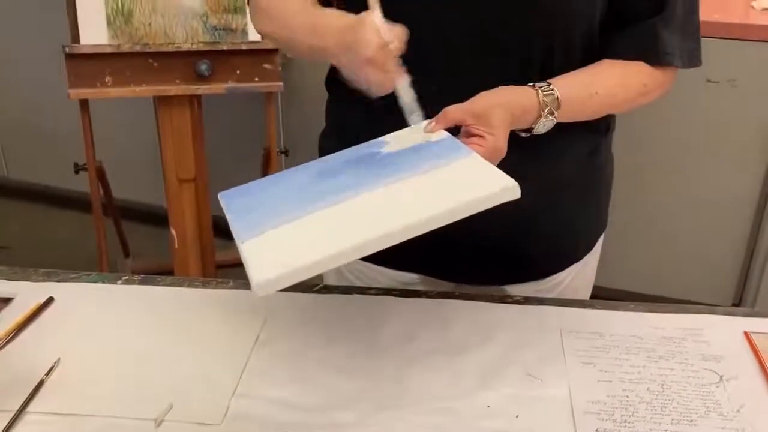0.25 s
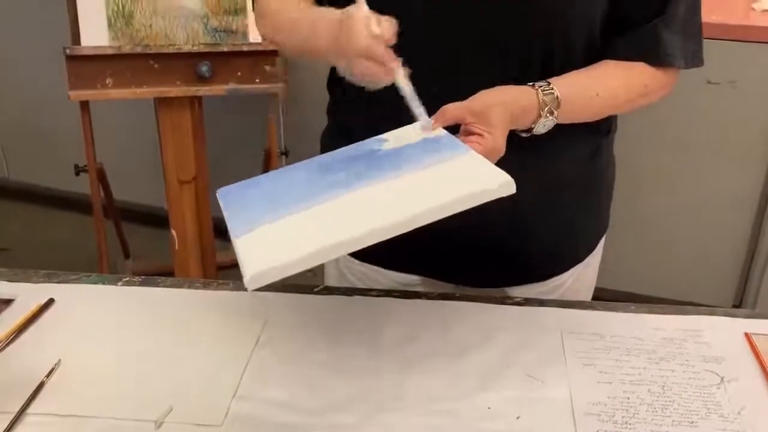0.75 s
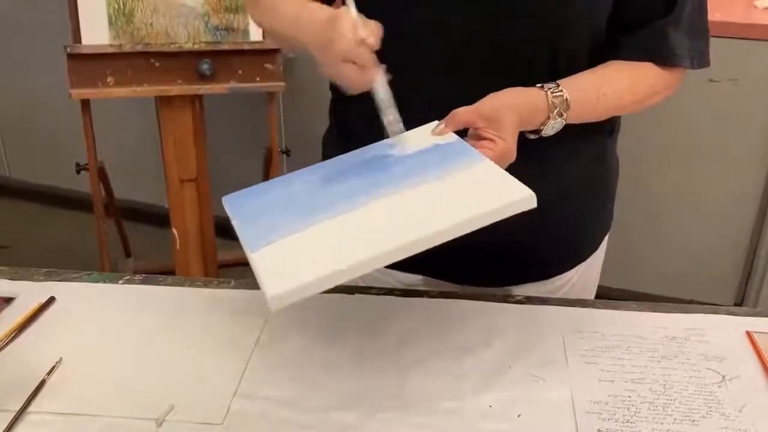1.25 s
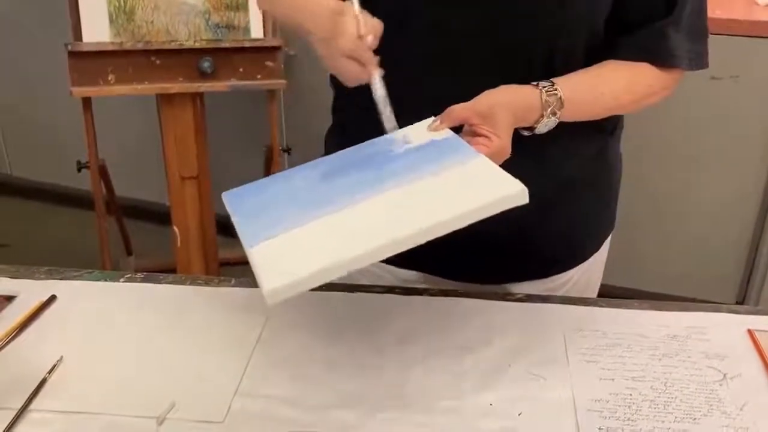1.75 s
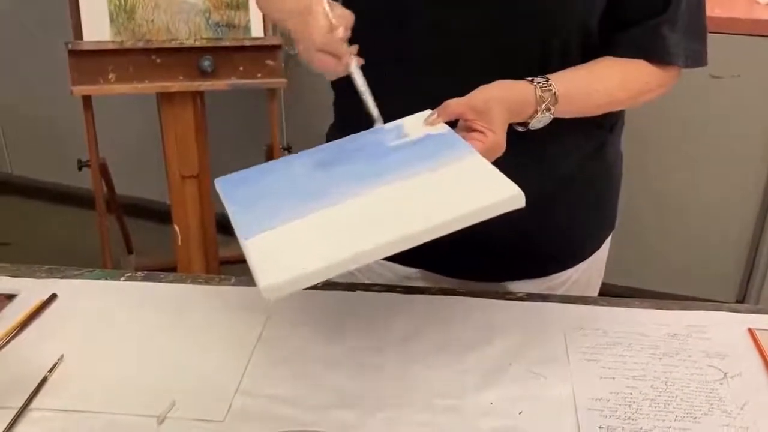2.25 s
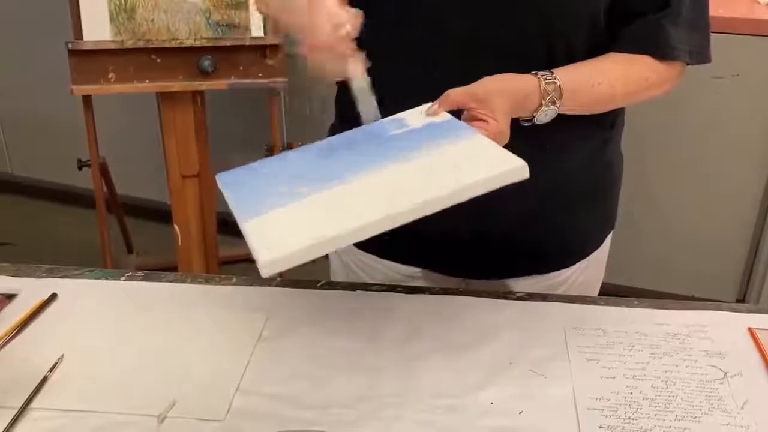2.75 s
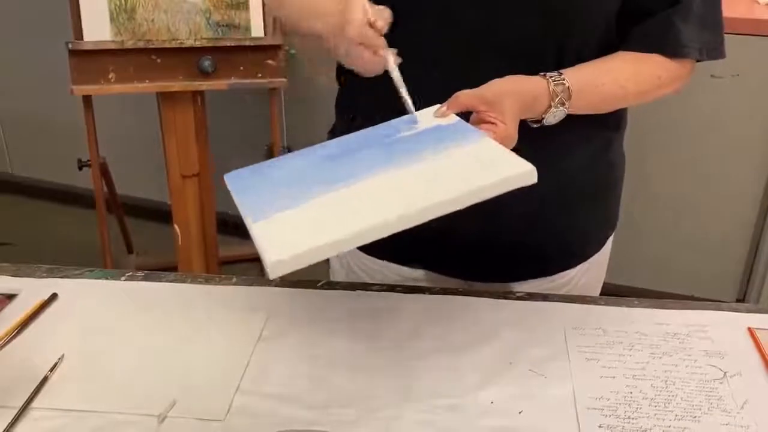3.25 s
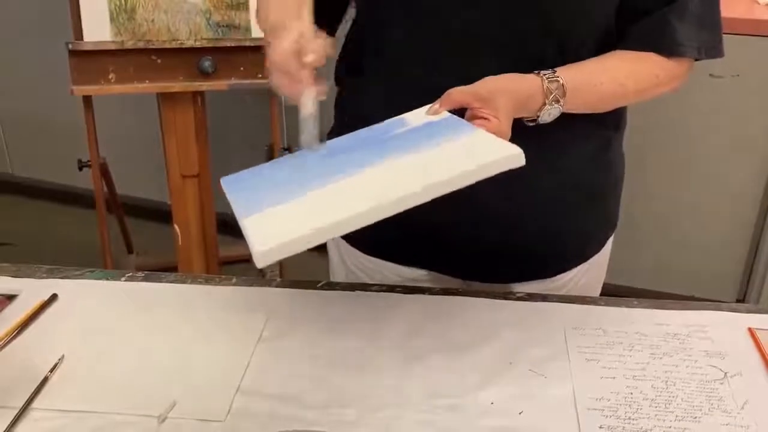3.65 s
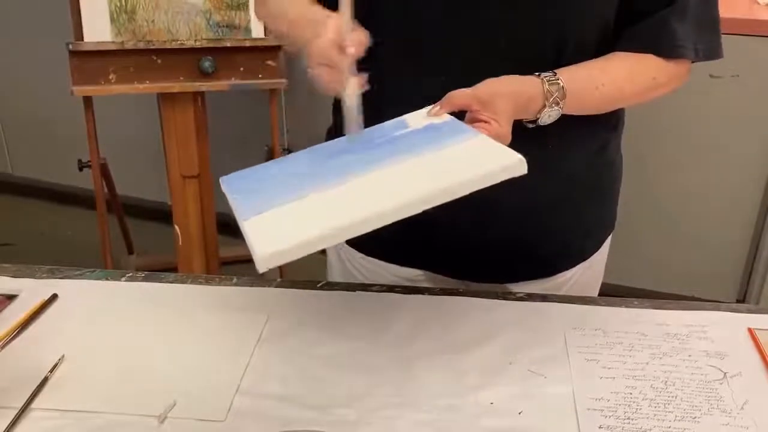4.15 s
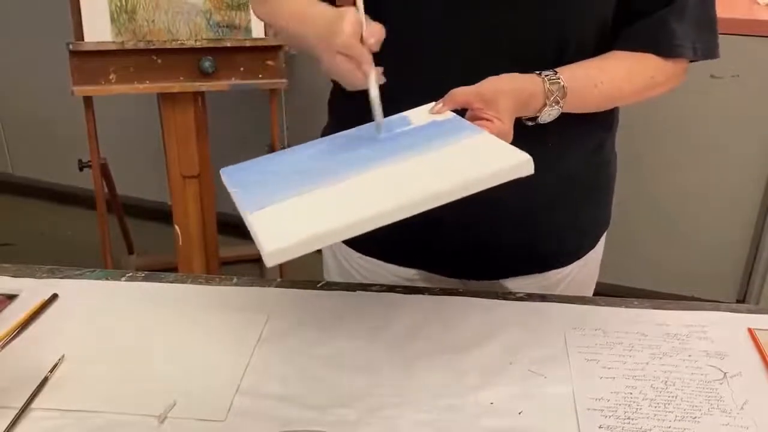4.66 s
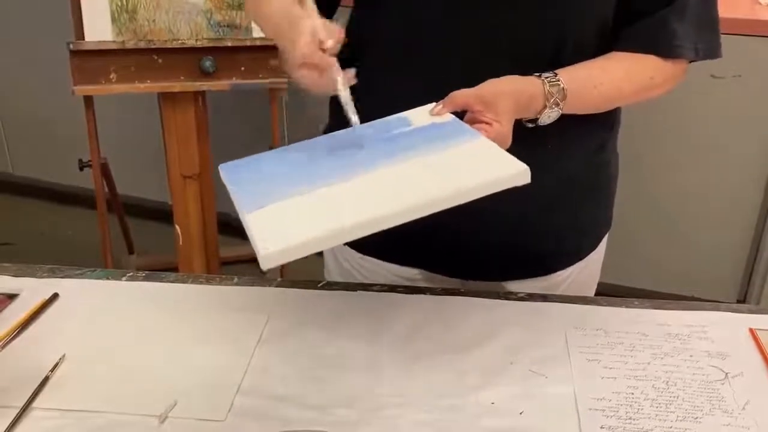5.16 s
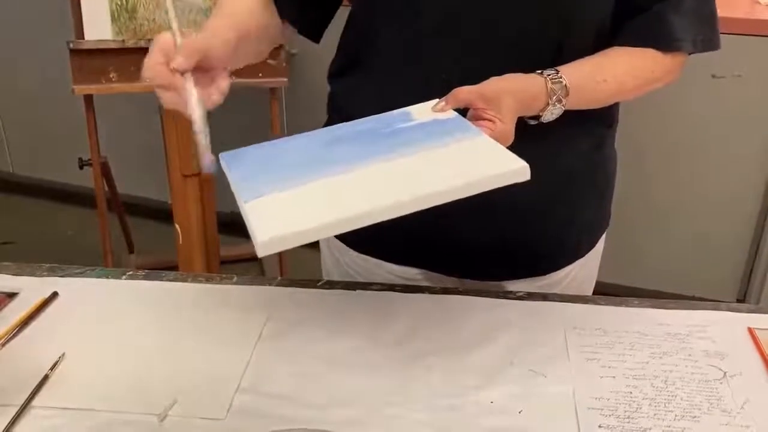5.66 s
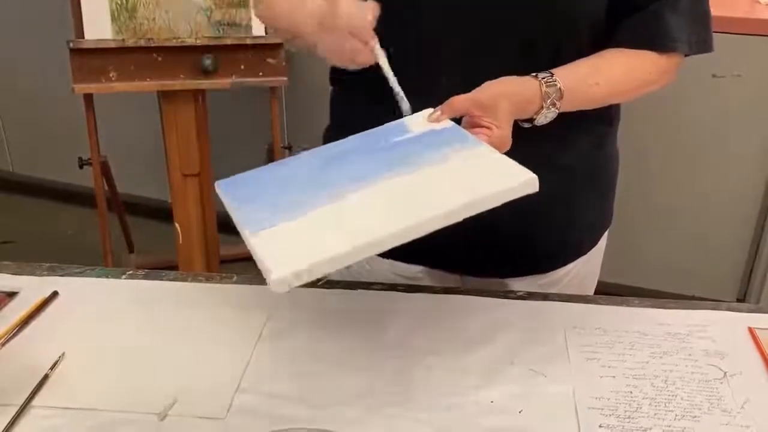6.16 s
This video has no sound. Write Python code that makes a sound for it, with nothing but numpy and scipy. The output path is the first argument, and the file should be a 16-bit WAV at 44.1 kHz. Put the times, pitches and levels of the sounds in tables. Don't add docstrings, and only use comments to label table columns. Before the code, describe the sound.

Steady low fan rumble and a wavering electrical hum lie under close bristle sounds on stretched cloth. Separate soft strokes come first, then a brighter, louder, hurried scrub, a short gap, and irregular sweeping strokes with small clicks of the brush against the frame. A dull thump comes late. The room is dry, the treble slightly warbly and full of small holes.

```python
import sys
import numpy as np
from scipy import signal
from scipy.io import wavfile
from scipy.ndimage import uniform_filter1d

SR = 44100
rng = np.random.default_rng(int(sys.argv[2]) if len(sys.argv) > 2 else 0)


def dump_mix(stems):
    frames = np.atleast_2d(stems).T
    limited = np.clip(frames, -1, 1)
    pcm = np.round(limited * 32767).astype(np.int16)
    wavfile.write(sys.argv[1], SR, pcm)


def natural_amplitude(level_db):
    exponent = np.asarray(level_db, float) / 20
    return 10 ** exponent


N = 283122


def evened(x):
    return x / np.sqrt(np.mean(np.abs(x) ** 2) + 1e-20)


def unit(power):
    return power / power.mean(0)


def read(points, hz, order=1):
    table = np.transpose(points)
    return np.interp(np.log(hz + 1), np.log(table[0] + 1), table[order])


def resonance(hz, centre_hz, width_hz):
    return 1 / (1 + (2 * (hz - centre_hz) / width_hz) ** 2) ** 2


def drift(rate_hz, t):
    rates = np.geomspace(rate_hz / 20, rate_hz, 20)
    return evened(sum(np.sin(2 * np.pi * (f * t + rng.random())) / np.sqrt(f) for f in rates))


def blotches(shape, frames, bins):
    x = uniform_filter1d(rng.standard_normal(shape[::-1]), frames, 0)
    return evened(uniform_filter1d(x, bins, 1)).T


def pair(a, b, hz, same, left, lead):
    c = np.clip(read(same, hz), -1, 1)[:, None]
    lean = natural_amplitude(read(left, hz) / 2)[:, None]
    late = np.exp(-1j * read(lead, hz))[:, None]
    return np.array([a * lean, (c * a * late + np.sqrt(1 - c ** 2) * b) / lean])


# f/Hz, level/dB
AIR_SPECTRUM = [(22, -38), (40, -5.5), (85, 0), (140, -3), (172, -8), (195, -19.5), (300, -19.5),
                (850, -21.5), (1200, -30.5), (2500, -37.5), (4500, -47.5), (5300, -50), (12500, -63.5),
                (13600, -69)]
AIR_DB = -32
# f/Hz, width/Hz, level/dB rms
DUCT = [(229.7, 31.5, -43.5), (273.2, 7.1, -46.5), (419, 32, -54)]
# f/Hz, likeness/1
AIR_SAME = [(30, 0.985), (130, 0.96), (290, 0.83), (640, 0.37), (1400, 0.53), (3100, 0.2), (7000, 0.9)]
# f/Hz, L-R/dB
AIR_LEFT = [(40, -6.5), (110, 1.5), (220, -2), (500, 2), (2000, 1.2), (6000, 0.5)]
# f/Hz, lead/rad
AIR_LEAD = [(30, 0.12), (110, -0.27), (340, .5), (700, 3), (1120, 1.5), (2200, 4), (4000, 8)]


def air():
    hz, t, z = signal.stft(rng.standard_normal((2, N)), SR, nperseg=4096)
    power = natural_amplitude(2 * AIR_DB) * unit(natural_amplitude(2 * read(AIR_SPECTRUM, hz)))
    for f, width_hz, db in DUCT:
        power += natural_amplitude(2 * db) * unit(resonance(hz, f, width_hz))
    swell_db = 0.33 * drift(1.15, t)
    z = pair(*z, hz, AIR_SAME, AIR_LEFT, AIR_LEAD) * np.sqrt(power)[:, None] * natural_amplitude(swell_db)
    standing_db = 2.24 * blotches(z.shape[1:], 8, 4)
    z *= natural_amplitude(standing_db * (hz[:, None] > 300))
    return signal.istft(z, SR, nperseg=4096)[1][:, :N]


# f/Hz, level/dB rms, wander/dB, L-R/dB
TONES = [(54.64, -41, -1.5, 1), (74.3, -51, 6.5, -10), (92.5, -48.5, 0, -3), (110.6, -53, -2.5, -5),
         (114.35, -29.5, 0.9, -3.5), (127.8, -67, -13, -25), (229.6, -48, 3, 0)]
# f/Hz, level re load/dB, wander/dB
BUZZ = [(238.2, 0.5, 0.5), (241.3, -9.5, 0.5)]
# t/s, buzz level/dB rms
BUZZ_LOAD = [(0.0, -43), (0.79, -39.5), (0.82, -54), (0.97, -40), (1.55, -38), (1.63, -53), (2.07, -33.5),
             (2.47, -45), (2.61, -34), (3.04, -51), (3.31, -34.5), (3.36, -45.5), (4.9, -40), (4.95, -62),
             (5.35, -36.5), (5.78, -62), (5.95, -38), (6.42, -39)]
BEAT_TOP_S = 2.72


def hum():
    t, out = np.arange(N) / SR, np.zeros((2, N))
    coarse_t = t[::500]
    for hz, db, wander_db, lean_db in TONES:
        level = natural_amplitude(db + wander_db * np.interp(t, coarse_t, drift(2.48, coarse_t)))
        tone = np.sqrt(2) * level * np.sin(2 * np.pi * (hz * t + rng.random()))
        out += tone * natural_amplitude(np.array([[0.5], [-0.5]]) * lean_db)
    load_db = np.interp(t, *np.transpose(BUZZ_LOAD))
    for hz, db, wander_db in BUZZ:
        level = natural_amplitude(load_db + db + wander_db * np.interp(t, coarse_t, drift(6.0, coarse_t)))
        phase = 2 * np.pi * hz * (t - BEAT_TOP_S) + np.array([[0.35], [0]])
        out += np.sqrt(2) * level * np.sin(phase)
    return out


def room(x, t60_s=0.14, wet_db=-10):
    t = np.arange(SR // 3) / SR
    tail = rng.standard_normal((2, len(t))) * natural_amplitude(-60 * t / t60_s) * (t > 0.004)
    tail /= np.linalg.norm(tail[0])
    return x + natural_amplitude(wet_db) * signal.fftconvolve(x, tail, axes=1)[:, :N]


# t/s, peak level/dB, f/Hz, t60/s
TAPS = [
    (3.2393, -34, 3160, 0.015),
    (3.6074, -27.5, 1280, 0.024),
    (4.837, -25.5, 1470, 0.018),
    (5.5077, -24.5, 4230, 0.014),
]
# t/s, peak level/dB, f/Hz, t60/s
THUMP = [
    (4.761, -22, 55.6, 0.29),
]
# t/s, peak level/dB
TICKS = [
    (1.5823, -35),
    (1.699, -21.5),
    (5.7963, -31.5),
]


def knocks():
    out, t = np.zeros((2, N + SR)), np.arange(SR) / SR
    for s, db, hz, t60_s in TAPS + THUMP:
        ring = np.sin(2 * np.pi * hz * t) + 0.29 * np.sin(2 * np.pi * 1.6 * hz * t)
        ring *= natural_amplitude(db - 60 * t / t60_s) * (1 - np.exp(-t * hz))
        start = round(s * SR)
        out[:, start:start + SR] += ring * natural_amplitude(np.array([[1.2], [-1.2]]))
    for s, db in TICKS:
        snap = rng.standard_normal((2, SR)) * natural_amplitude(db - 7 - 60 * t / 0.026)
        start = round(s * SR)
        out[:, start:start + SR] += snap
    return out[:, :N]


# t/s, length/s, weave level/dB, tips re weave/dB, cloth re weave/dB
SWEEPS = [(-0.104, 0.17, -52.5, 8, -3.5), (0.035, 0.22, -40.5, 2.5, -4.5), (0.169, 0.12, -47.5, -2, -6),
          (0.313, 0.24, -44.5, 2.5, -3.5), (0.487, 0.092, -55, -9, -1), (0.635, 0.22, -47.5, 3.5, -0.5),
          (1.037, 0.2, -48.5, 1, -0.5), (1.301, 0.18, -46, 1.5, -4.5), (2.77, 0.23, -41.5, -0.5, -9.5),
          (2.94, 0.16, -40, 1, -1.5), (3.03, 0.2, -54, 3, -14), (3.185, 0.18, -48.5, 6.5, -8),
          (3.236, 0.28, -44, 2.5, -1.5), (3.505, 0.18, -41, -1, -4), (3.785, 0.19, -45.5, -0.5, -9),
          (3.867, 0.19, -45, 2, -5.5), (4.233, 0.28, -48.5, 2, -1), (4.533, 0.12, -61.5, 0.5, 6),
          (4.676, 0.29, -50, 1.5, -1), (4.914, 0.16, -42.5, -2.5, -4.5), (5.016, 0.14, -50.5, 5.5, -6),
          (5.131, 0.16, -46, 5.5, -16), (5.213, 0.15, -48.5, 3.5, -3), (5.36, 0.24, -45, -1, -2)]
# t/s, length/s, weave level/dB, tips re weave/dB, cloth re weave/dB
RUBS = [(0.595, 0.077, -55, 3.5, -10), (1.557, 0.15, -38, 0, -6), (1.671, 0.098, -39.5, 4, -6.5),
        (1.752, 0.12, -38.5, 2, -7.5), (1.841, 0.11, -37.5, -1, -4), (1.935, 0.12, -34, -4, -13.5),
        (2.028, 0.093, -30, -4, -14.5), (2.101, 0.12, -35, -1, -25), (2.197, 0.088, -36.5, -5, -20),
        (2.265, 0.1, -39.5, 1.5, -21), (2.358, 0.082, -35, 0, -17), (2.431, 0.12, -48.5, 8, -19),
        (2.526, 0.051, -41, -1, -21), (5.76, 0.1, -52.5, 0, -13), (5.989, 0.071, -45, 1.5, -16),
        (6.278, 0.094, -34, -4, -14.5)]


def stroked(t, db, sharp, late, offset_db):
    start, length = np.transpose(SWEEPS + RUBS)[:2, :, None]
    progress = np.clip((t - start) / length, 0, 1)
    arch = abs(np.sin(np.pi * progress ** late)) ** sharp
    return (natural_amplitude(2 * (db + offset_db))[:, None] * arch).sum(0) + 1e-12


# f/Hz, level/dB
WEAVE = [(500, -6.5), (1100, -19), (1900, -9), (2500, -4), (3100, -6.5), (3700, -1), (4500, -15),
         (6000, -29)]
# f/Hz, level/dB
RASP = [(2500, -46), (3700, -11), (4300, 4.5), (5300, 0.5), (6500, -4), (7500, -14), (9000, -40)]
# f/Hz, level/dB
TIPS = [(5000, -12.5), (6800, 2.5), (8300, 3.5), (10000, 4), (12000, 0), (13400, 1), (15000, 1),
        (16000, -10.5)]
# f/Hz, likeness/1
STROKE_SAME = [(600, 0.76), (1500, 0.98), (3000, 0.92), (5000, 0.54), (7000, 0.095), (15000, 0.084)]
# f/Hz, L-R/dB
STROKE_LEFT = [(1000, 4), (2400, 0), (4400, 2.5), (8000, -0.4)]
# f/Hz, lead/rad
STROKE_LEAD = [(600, -4.4), (1700, 0.23), (2800, 1.36), (4200, 1.86), (5900, 3.5), (7600, 4.5)]
# sharpness, lateness exponent, offset/dB
WEAVE_ARCH, TIPS_ARCH, CLOTH_ARCH = (5, 0.96, 0.25), (4.17, 0.85, 0.25), (6.3, 0.99, -0.67)
RASP_DB, RASP_PER_DB, FULL_SCRUB_DB = -0.3, 0.17, -26
LINGER_S, LINGER_DB = 0.054, -16


def brush(tick_db=3.0, patchy_db=3.5, flicker_db=1.2, cloth_hz=1520, cloth_width_hz=560, tail=0.12):
    ticks = rng.standard_normal((2, N)) * natural_amplitude(tick_db * np.minimum(rng.exponential(1, N), 5))
    hz, t, z = signal.stft(evened(ticks), SR, nperseg=256, noverlap=192)
    scrub_db, tips_db, drum_db = np.transpose(SWEEPS + RUBS)[2:]
    scrub = stroked(t, scrub_db, *WEAVE_ARCH)
    drum = stroked(t, scrub_db + drum_db, *CLOTH_ARCH)
    tips = stroked(t, scrub_db + tips_db, *TIPS_ARCH)

    rasp_db = RASP_DB + RASP_PER_DB * (10 * np.log10(scrub) - FULL_SCRUB_DB)
    rasp = np.clip(natural_amplitude(2 * rasp_db), 0.05, 0.9)
    power = np.outer(unit(natural_amplitude(2 * read(WEAVE, hz))), 1 - rasp)
    power += np.outer(unit(natural_amplitude(2 * read(RASP, hz))), rasp)
    power *= scrub
    power += np.outer(unit(resonance(hz, cloth_hz, cloth_width_hz)), drum)
    power += np.outer(unit(natural_amplitude(2 * read(TIPS, hz))), tips)

    power = signal.lfilter([1 - tail], [1, -tail], power)
    keep = np.exp(-(t[1] - t[0]) / LINGER_S)
    power += natural_amplitude(2 * LINGER_DB) * signal.lfilter([1 - keep], [1, -keep], power)

    patches = blotches(power.shape, 16, 2)
    flicker = evened(uniform_filter1d(rng.standard_normal(len(t)), 6))
    z = pair(*z, hz, STROKE_SAME, STROKE_LEFT, STROKE_LEAD) * np.sqrt(power)
    z *= natural_amplitude(patchy_db * patches + flicker_db * flicker)
    return signal.istft(z, SR, nperseg=256, noverlap=192)[1][:, :N]


def scene():
    return air() + hum() + room(brush() + knocks())


# f/Hz, whistle chance/1, hole chance/1
THRIFT = [(5300, 0., 0.), (6200, 0., .05), (7200, .06, .55), (8200, .2, .35), (9000, .08, .5),
          (9800, .28, .18), (12000, .25, .45), (13400, .08, .75), (14500, .22, .4), (15500, .1, .7)]
# f/Hz, level re neighbours/dB
ROUNDED_AWAY = [(300, -26.5), (1000, -3.5), (4000, -5.5), (7000, -3.5), (12000, -3.5)]
BAND_HZ, GAP_HZ, TOP_HZ = 750, 9170, 15840


def thrifty_link(x, uneven_db=3.5, whistle_db=17.0, whistle_hz=70, gap_db=-30):
    mid_side = [x[0] + x[1], x[0] - x[1]]
    hz, t, z = signal.stft(mid_side, SR, nperseg=2048, noverlap=1536)
    band = ((hz + 120) // BAND_HZ).astype(int)
    half = ((hz + 120) // (BAND_HZ / 2)).astype(int)
    luck = rng.random((len(t) // 4 + 2, 4, half.max() + 1))
    luck = np.repeat(luck, 4, 0)[:len(t)].transpose(1, 2, 0)

    treble = (abs(z[:, 180:300]) ** 2).mean((0, 1))
    treble_db = 10 * np.log10(uniform_filter1d(treble, 30) + 1e-12)
    short = (0.5 + luck[3, 0]) * np.interp(treble_db, [-68, -58], [1.15, 0.7])

    fate = np.where(luck[2] < 0.5, luck[0], luck[:2])
    whistle = fate[:, band] < short * read(THRIFT, band * BAND_HZ)[:, None]
    wide = np.where(luck[3, band] < 0.5, fate[:, band], fate[:, half])
    side_risk = np.array([1, 1.7])[:, None, None]
    hole = 1 - wide < short * read(THRIFT, hz, order=2)[:, None] * side_risk

    edge = natural_amplitude(whistle_db) * np.exp(-((hz - band * BAND_HZ) / whistle_hz) ** 2)[:, None]
    kept = ~hole * natural_amplitude(uneven_db * (2 * luck[3, half] - 1) * (hz > 6500)[:, None])
    faint_loss = np.interp(hz, [5200, 6000, 12600, 13200], [0, 0.2, 0.2, 0.65])
    faint = wide > faint_loss[:, None]
    power = uniform_filter1d(abs(z) ** 2, 25, 1)
    loud = power.sum(0) > natural_amplitude(2 * -84)
    gain = np.where(loud, np.where(whistle, edge, kept), faint)
    gain *= abs(z) ** 2 > power * natural_amplitude(2 * read(ROUNDED_AWAY, hz))[:, None]

    notch = 1 - (1 - natural_amplitude(gap_db)) * np.exp(-((hz - GAP_HZ) / 170) ** 4)
    gain *= (notch * (hz < TOP_HZ))[:, None]
    mid, side = signal.istft(z * gain, SR, nperseg=2048, noverlap=1536)[1][:, :N]
    return np.array([mid + side, mid - side]) / 2


def top_cut(x):
    return signal.sosfilt(signal.butter(12, 16410, fs=SR, output="sos"), x)


def record(dry):
    mix = thrifty_link(dry)
    return top_cut(mix)


dry = scene()
out = record(dry)
dump_mix(out)
```